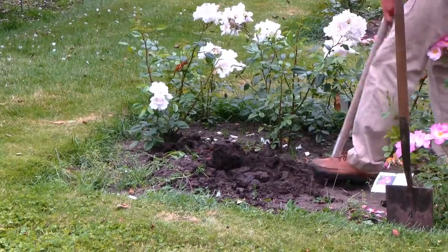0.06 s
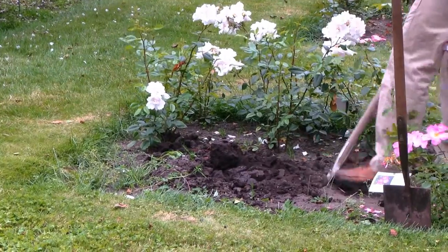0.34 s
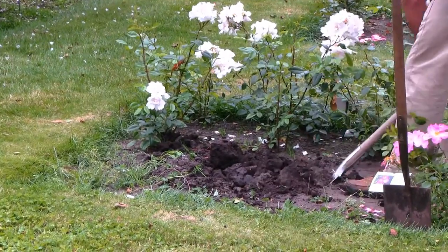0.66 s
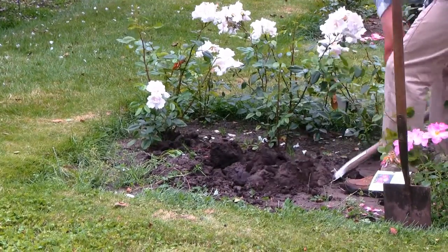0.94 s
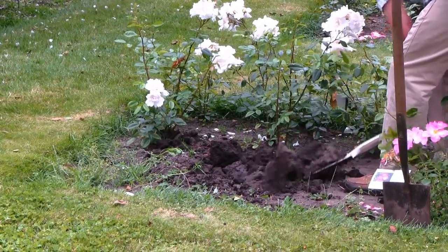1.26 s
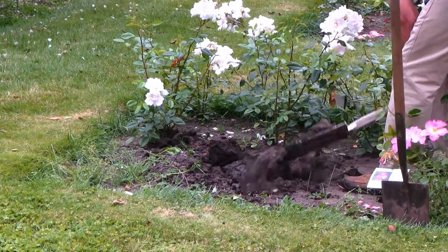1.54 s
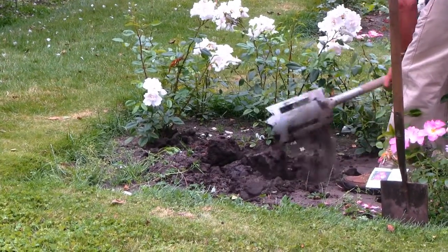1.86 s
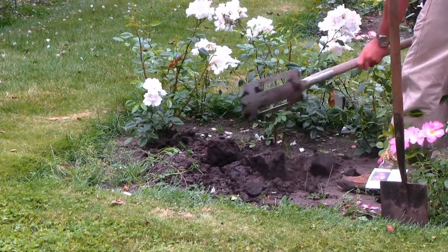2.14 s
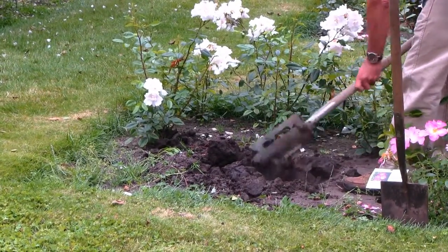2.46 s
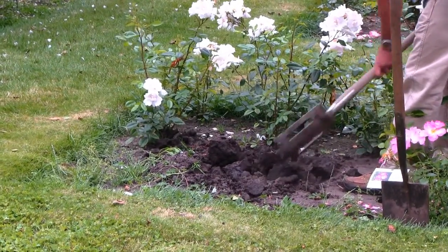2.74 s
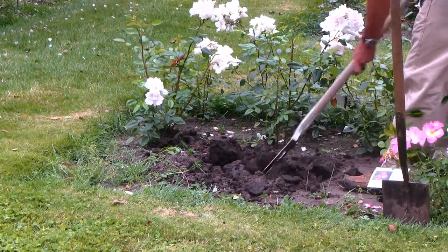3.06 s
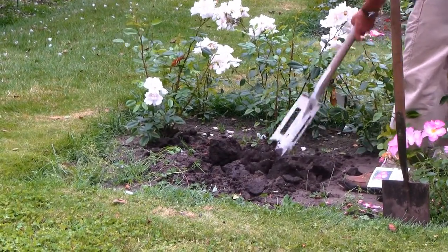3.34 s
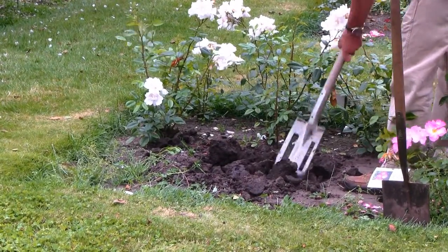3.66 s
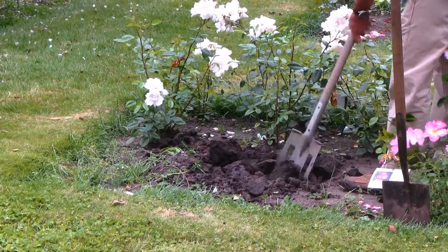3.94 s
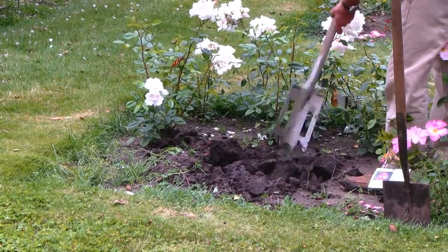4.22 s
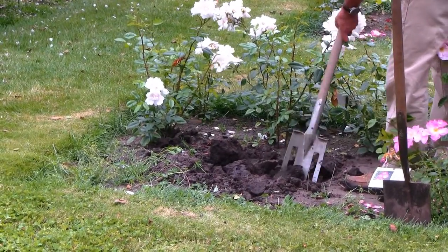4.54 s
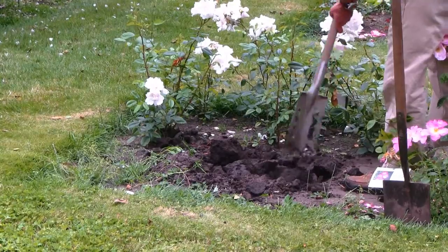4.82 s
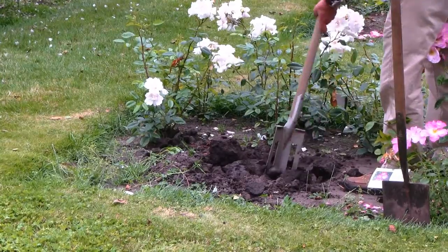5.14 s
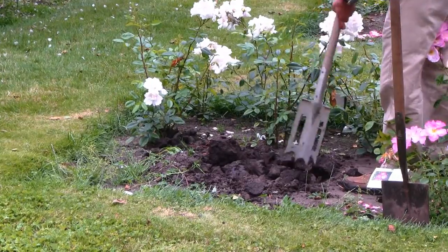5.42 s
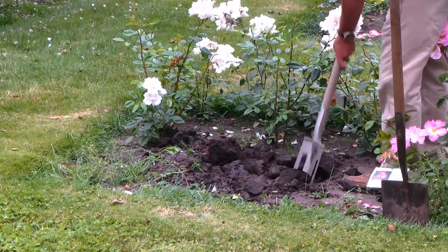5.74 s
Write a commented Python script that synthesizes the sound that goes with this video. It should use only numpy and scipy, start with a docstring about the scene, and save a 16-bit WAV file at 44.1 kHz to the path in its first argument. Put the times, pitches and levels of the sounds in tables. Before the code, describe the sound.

Low wind rumble buffets the microphone throughout, strongest from about 1.4 to 2 seconds, over faint outdoor air. A steel spade works garden soil, giving a light knock at 0.5 seconds, a soft scrape at 0.9, a click at 1.3 and a quick cluster of crunches at 1.5. Loose earth trickles faintly between strokes. Sharp, stony clicks come at 2.3 and 2.6 seconds, then the chopping grows busier: a scrape and hit at 3.1, hard knocks at 3.5 and 4.0, with a gritty scrape between them at 3.7. More stabs and chattering scrapes follow from 4.4 to 4.7 and from 5.1 to 5.3. The blade rings faintly around 3.5, 3.7 and 5.3 seconds. A distant engine drones quietly from about 4 seconds, and crumbs rustle near the end at 5.8. Nearly everything is on the left.

```python
"""Digging on a windy day

A slotted steel spade levers up garden soil, then chops and scrapes through the clods. Each stab knocks,
crunches and chatters through grit, and the blade rings faintly after a hard blow or as it comes free.
Gusts buffet the microphone and make a limiter turn the garden down; an engine drones far off.
Nearly all the sound is on the left."""
import sys
import numpy as np
from scipy import signal
from scipy.fft import rfft, irfft
from scipy.io import wavfile
from scipy.ndimage import uniform_filter1d

SR = 44100
rng = np.random.default_rng(int(sys.argv[2]) if len(sys.argv) > 2 else 0)


def unload_wav(signal):
    """Save mono or channel-first audio to the path in sys.argv[1] as 16-bit WAV at rate SR, clipped to [-1, 1]."""
    wavfile.write(
        sys.argv[1],
        SR,
        np.round(np.clip(np.atleast_2d(signal).T, -1, 1) * 32767).astype(np.int16),
    )


N = 255339
TIME = np.arange(N) / SR
FREQS = np.fft.rfftfreq(N, 1 / SR)
FILTER_HZ = np.fft.rfftfreq(4096, 1 / SR)

# Tone of the outdoor air: pitch_hz, level_db
AIR_TONE = [(120, -6.5), (330, -5), (500, -0.5), (780, -3.5), (1600, -12), (2600, -19), (6000, -29),
            (13000, -32), (15800, -56)]
# Tone of the engine's roar: pitch_hz, level_db
ENGINE_TONE = [(150, -24), (310, -11), (460, 0), (700, -2), (950, -9), (3200, -32), (5000, -37.5),
               (13000, -44.5), (15800, -69)]
# How fast the engine fires: time_s, rate_hz
FIRING_RATE = [(3.4, 120.1), (4.6, 110.8), (5.79, 116.4)]
# Notes in the engine's hum: multiple_of_firing_rate, level_db
HUM_NOTES = [(4, -1), (5, -16.5), (6, -5.5)]
# The engine swells: time_s, level_db
ENGINE_LEVEL = [(2.8, -86), (4.0, -47.5), (4.2, -42), (4.95, -48), (5.35, -45), (5.79, -48.5)]
# Its hum compared with its roar: time_s, level_db
HUM_LEVEL = [(3.8, -44), (4.7, 3), (5.79, -3.5)]

# Tone of the wind's rumble and of its small swirls: pitch_hz, level_db
RUMBLE_TONE = [(10, -23), (22, -12.5), (39, 6), (75, -6.5), (124, -19.5), (250, -48), (450, -79),
               (1200, -100)]
FLUTTER_TONE = [(30, 5), (80, 12), (140, 3.5), (230, -6.5), (400, -23), (900, -71)]
# The breeze between gusts: time_s, level_db
BREEZE = [(0, -18), (.66, -23.5), (.74, -26), (1.15, -28.5), (2.08, -38.5), (2.17, -27.5), (2.3, -39.5),
          (3.3, -31.5), (3.45, -34.5), (4.05, -19.5), (4.7, -36), (5.1, -24), (5.79, -30)]
# Gusts on the microphone: start_s, length_s, level_db
GUSTS = [(-.03, 0.095, -23), (.14, 0.17, -13), (.45, 0.12, -17), (.82, 0.088, -18.5), (1.29, 0.093, -24),
         (1.36, 0.22, -9), (1.605, 0.08, -7), (1.72, 0.14, -7), (1.92, 0.073, -5.5), (2.38, 0.13, -19),
         (2.51, 0.19, -11.5), (2.74, 0.099, -16.5), (2.855, 0.07, -14), (2.985, 0.028, -21),
         (3.65, 0.065, -8), (3.8, 0.166, -12.5), (4.115, 0.098, -15), (4.31, 0.1, -20.5),
         (4.55, 0.053, -16), (5.18, 0.073, -20), (5.29, 0.1, -24.5), (5.47, 0.25, -21), (5.72, 0.1, -14)]
# Single swirls that slap the microphone: peak_s, level_db
SLAPS = [(0.33, -16.5), (0.617, -20.5), (1.409, -15.5), (1.54, -11.5), (1.634, -15), (2.414, -9),
         (3.377, -27.5), (3.82, -16), (5.78, -16.5)]

# Tone of loose soil: pitch_hz, level_db
SOIL_TONE = [(1500, -13), (2500, -8), (4200, -5), (6200, 1.5), (9000, -5), (13000, -13), (15800, -36)]
# Soil trickles as the blade works it: start_s, length_s, level_db
TRICKLES = [(0, 0.17, -58.5), (.4, 0.43, -59), (.665, 0.3, -52), (1.02, 0.25, -64.5), (1.68, 0.63, -63),
            (2.36, 0.17, -59), (2.77, 0.055, -55.5), (3.17, 0.13, -52.5), (4.09, 0.12, -50),
            (4.99, 0.15, -51), (5.575, 0.18, -48), (5.68, 0.12, -43)]

# The blade's own notes: pitch_hz, level_db, time_to_fade_60_db_s
BLADE_NOTES = [(820, -7, 0.05), (1121, -12, 1), (1404, -4, .04), (1648, -9, 0.58), (1736, -2, 0.16),
               (2140, -4.5, .1), (2670, -1.5, 0.058), (2978, -2.5, 0.095), (3230, -5.5, 0.034),
               (3597, -12, 0.41), (3840, -5.5, 0.16), (4430, 4.5, 0.06), (4545, -14, 0.1), (4840, -5, 0.18),
               (5790, -0.5, 0.07), (6380, -15.5, .05), (6940, -19, .04)]
# Five bands, low to high, that shape knocks and scrapes: pitch_hz
BANDS_HZ = [480, 1060, 2300, 4450, 8500]
# Tone shared by all scrapes, one value a band: level_db
SCRAPE_TONE = [-2.5, -1.5, -3.5, -3, -8.5]
# Tone shared by all knocks, one value a band: level_db
KNOCK_TONE = [-1, 4.5, -5, -2, -7.5]
# The blade slides through grit: start_s, length_s, swell_db, pitch_hz, level_db, tilt_db_per_octave
SCRAPES = [(0.868, 0.082, 11.5, 1800, -45, -8), (2.596, 0.023, 2, 4840, -34, -6.5),
           (2.626, 0.013, -15, 5600, -25.5, -6), (2.991, 0.15, -6.5, 5800, -37, 0),
           (3.128, 0.017, -9, 3340, -24.5, -0.5), (3.214, 0.12, -11, 3620, -45, -3),
           (3.407, 0.13, 14, 4260, -39.5, -4.5), (3.521, 0.098, -11, 1280, -27, -3),
           (3.659, 0.055, 15, 4180, -24.5, 0), (4.421, 0.055, -3, 4630, -35, 0),
           (4.457, 0.037, -8, 2270, -29.5, 1), (4.589, 0.038, 11, 4540, -26, -3.5),
           (4.617, 0.035, 1.5, 2160, -17.5, 0), (5.1, 0.012, -1, 3020, -27, 3),
           (5.169, 0.089, 2, 4170, -36.5, 2), (5.229, 0.031, -2, 3173, -24, -1.6),
           (5.264, 0.024, 0, 3640, -21, -1.5)]
# The blade hits a clod or stone: hit_s, decay_s, pitch_hz, level_db, tilt_db_per_octave, stone_boost_db
KNOCKS = [(0.471, 0.0046, 910, -20, -2.5, 6), (0.4922, 0.017, 1090, -35, 1, 2),
          (0.975, 0.00086, 10300, -40, 5.5, 15.5), (1.277, 0.001, 2500, -21, -4.5, 0),
          (1.4724, 0.0026, 1620, -14, 1, 21.5), (1.4762, 0.0027, 6200, -14, 3.5, 5),
          (1.4889, 0.0026, 2290, -17.5, -7, 14), (1.4973, 0.0024, 2960, -12, 3, 0.5),
          (2.3477, 0.0013, 2800, -11, 0.5, 2), (2.525, 0.022, 5830, -34, 1, 2),
          (2.545, 0.0025, 6040, -31, 0.5, 24.5), (2.5864, 0.0013, 1520, -5.5, -3, 25),
          (2.5868, 0.0019, 820, -9, 1, 14), (3.101, 0.0021, 3300, -5, -1, 19.5),
          (3.171, 0.0051, 1540, -30.5, 0, 10), (3.508, 0.0055, 1610, -0.5, -2, -0.5),
          (3.707, 0.0042, 3930, -15, 3, 5.5), (3.96, 0.0031, 1070, 4.5, -5, -7),
          (4.4751, 0.0026, 1960, -13.5, -2.5, 8.5), (4.5125, 0.0023, 1060, -4.5, -0.5, -1),
          (4.6338, 0.0034, 4320, -9.5, 2, 2), (4.6436, 0.0042, 1920, -28, 8, 17),
          (5.062, 0.019, 4800, -8.5, -4, 9.5), (5.081, 0.0086, 920, -12, 3.5, 16.5),
          (5.0927, 0.0034, 1110, -1.5, -2.5, -29), (5.267, 0.01, 2770, -28.5, 5.5, 21.5)]
# The blade rings on: start_s, favoured_pitch_hz, level_db
RINGS = [(3.255, 3580, -44), (3.512, 1170, -21), (3.718, 2940, -23.5), (4.645, 3470, -36),
         (5.28, 3620, -29)]

# Tone of the leak into the right channel and of the hiss there: pitch_hz, level_db
LEAK_TONE = [(100, -72.5), (400, -50), (4000, -45), (12000, -34)]
HISS_TONE = [(30, 22.5), (300, 13.5), (2000, 8.5), (13500, 2), (15800, -0.5)]

LEAD_S = .01  # room before each hit for the first crumbs


def amp(db):
    """Turns decibels into a gain."""
    return 10 ** (np.asarray(db) / 20)


def unit(x):
    """Scales a signal to an average power of 1."""
    return x / np.sqrt(np.mean(x ** 2) + 1e-20)


def curve(rows):
    """Joins (time_s, value) points with straight lines."""
    return np.interp(TIME, *np.transpose(rows))


def tone_db(tone, hz):
    """Looks up a tone table's level at each pitch."""
    pitches, db = np.transpose(tone)
    return np.interp(np.log(hz + 1), np.log(pitches + 1), db)


def add(mix, start_s, sound):
    """Mixes a sound in at its start time."""
    part = mix[max(round(start_s * SR), 0):][:len(sound)]
    part += sound[:len(part)]


def shaped(x, tone):
    """Filters a signal by a tone table."""
    return irfft(rfft(x) * amp(tone_db(tone, FREQS)), N)


def noise(tone):
    """Noise with the given tone, at power 1."""
    return unit(shaped(rng.standard_normal(N), tone))


def drift(hz):
    """A random wobble, up to about hz."""
    return unit(irfft(rfft(rng.standard_normal(N)) / (1 + (FREQS / hz) ** 4), N))


def swells(rows, rise_s, fall_s=.015):
    """A loudness curve in which each row rises, holds and dies away."""
    power = np.zeros(N)
    for start_s, length_s, db in rows:
        rise = np.clip((TIME - start_s) / rise_s, 0, 1)
        fall = np.exp(-np.maximum(TIME - start_s - length_s, 0) / fall_s)
        power += (amp(db) * rise * fall) ** 2
    return np.sqrt(power)


def air_and_engine():
    """Over steady outdoor air, a far engine roars and hums at multiples of its firing rate."""
    midrange = signal.butter(4, [500, 1800], "band", fs=SR, output="sos")
    air, roar = (x / np.std(signal.sosfilt(midrange, x)) for x in (noise(AIR_TONE), noise(ENGINE_TONE)))
    firings = np.cumsum(curve(FIRING_RATE) * (1 + .00251 * drift(4.57))) / SR
    hum = sum(amp(db + 3.5 * drift(6)) * np.sin(2 * np.pi * k * firings) for k, db in HUM_NOTES)
    engine = amp(curve(ENGINE_LEVEL)) * (roar + hum * amp(curve(HUM_LEVEL)))
    flicker = amp(1.4 * drift(25))
    return flicker * (amp(-52) * air + engine)


def even_noise(tone, samples, floor):
    """Noise with its chance swings in loudness evened out."""
    x = noise(tone)
    return unit(x / np.sqrt(uniform_filter1d(x ** 2, size=samples, mode="wrap") + floor))


def wind(slap_rise_s=.013, slap_fall_s=.022):
    """Gusts ride on a breeze and push on the microphone; small, higher swirls grow with them."""
    rumble = even_noise(RUMBLE_TONE, samples=2200, floor=.0044)
    flutter = even_noise(FLUTTER_TONE, samples=900, floor=.019)
    strength = np.hypot(amp(curve(BREEZE)), swells(GUSTS, rise_s=.014))
    puffs = strength ** .78 * amp(-18.5 + 5.5 * drift(36))
    slaps = sum(amp(db) * np.exp(-np.maximum((s - TIME) / slap_rise_s, (TIME - s) / slap_fall_s))
                for s, db in SLAPS)
    lumps = amp(2 * drift(12))
    return rumble * lumps * strength + flutter * (puffs + slaps)


def loose_soil(crumbs_per_s=2500):
    """Trickling crumbs make a fine rustle with a few larger ticks."""
    sizes = amp(4 * np.minimum(rng.exponential(1, N), 5))
    crumbs = rng.standard_normal(N) * sizes * (rng.random(N) < crumbs_per_s / SR)
    rustle = unit(shaped(unit(crumbs) + 1.2 * rng.standard_normal(N), SOIL_TONE))
    flow = amp(-79) + swells(TRICKLES, rise_s=.0075)  # the soil never quite stops settling
    return rustle * flow * amp(-5.5 + 1.8 * drift(60))


def grit(loudness, per_s, spread_db):
    """Grains crack in clicks of uneven size, following a loudness curve."""
    n = len(loudness)
    sizes = amp(spread_db * np.minimum(rng.exponential(1, n), 4)) * rng.choice([-1, 1], n)
    clicks = loudness * (sizes * (rng.random(n) < per_s / SR) + .15 * rng.standard_normal(n))
    spectrum = rfft(clicks, 2 * n)
    broad_tone = np.sqrt(abs(uniform_filter1d(abs(spectrum) ** 2, size=n // 50)) + 1e-20)
    return irfft(spectrum / broad_tone)[:n] * np.linalg.norm(loudness)  # lows and highs made even


def contact_tone(tone, level_db, tilt_db, hz, stone_db=0):
    """Band levels of one contact: a shared tone, tilted, with a broad hump where stone is met."""
    bands = np.array(BANDS_HZ)
    octaves = np.log2(bands / bands[2])
    hump = np.exp(-(np.log2(bands / hz) / .76) ** 2)
    return np.array(tone) + level_db + tilt_db * octaves + stone_db * hump


def buried_blade(x, band_db, steel_db, damping, peak_db=0):
    """Filters a crunch through the blade; soil damps its notes, which makes them broader."""
    tone = [(100, band_db[0] + 1.5), (280, band_db[0] - 10), *zip(BANDS_HZ, band_db),
            (15500, band_db[-1] - 14.5)]
    notes = 0
    for hz, db, _ in BLADE_NOTES:
        louder, higher = rng.standard_normal(2)  # each contact loads the blade differently
        distance = (FILTER_HZ - hz * (1 + .03 * higher)) / (22 + damping * hz)
        notes += amp(db + 3.5 * louder) / (1 + distance ** 2)
    steel = 1 + amp(steel_db) * notes
    steel /= np.sqrt(uniform_filter1d(steel ** 2, size=280))
    ripple = unit(np.convolve(rng.standard_normal(len(FILTER_HZ)), np.hanning(25), "same"))
    ripple_db = 4.5 * np.minimum(FILTER_HZ / 4000, 1) * (np.tanh(ripple) - .2)
    log_gain = np.log(amp(tone_db(tone, FILTER_HZ) + peak_db + ripple_db - 1.5) * steel)
    # build a filter that sounds only after it is struck (minimum phase)
    mirrored = np.r_[log_gain, log_gain[-2:0:-1]]
    response = np.fft.ifft(np.exp(np.conj(signal.hilbert(mirrored)))).real
    return signal.fftconvolve(x, response[:2048])


def resonate(x, hz, width_hz):
    """Keeps the part of a sound near a moving pitch."""
    spin = np.exp(2j * np.pi * np.cumsum(hz) / SR)
    feedback = np.exp(-np.pi * width_hz / SR)
    return 2 * (spin * signal.lfilter([1 - feedback], [1, -feedback], x / spin)).real


def ring(hz, beat_hz=7.5, rise_s=.008):
    """The blade's prongs ring, most near hz. They are not quite alike, so each note beats with a twin."""
    t = TIME[:24576]
    out = np.zeros(len(t))
    for note_hz, db, fade_s in BLADE_NOTES:
        cut_db = min(70 * abs(np.log2(note_hz / hz)), 20)
        cycles = note_hz * t + rng.random()
        pair = np.sin(2 * np.pi * cycles) - .4 * np.sin(2 * np.pi * (cycles + beat_hz * t))
        out += amp(db - cut_db - 60 * t / fade_s) * pair
    return out * np.minimum(t / rise_s, 1)


def scrape(length_s, swell_db, hz, level_db, tilt_db):
    """The blade sticks and slips through grit, chattering at a pitch that wanders and sinks."""
    t = TIME[:24576]
    progress = np.minimum(t / length_s, 1) - .5  # zero halfway through
    bite = 1 - np.exp(-t / (.09 * length_s))
    release = np.exp(-np.maximum(t - length_s, 0) / .0088)
    slips, wander = (unit(uniform_filter1d(rng.standard_normal(len(t)), size=n)) for n in (170, 400))
    loudness = bite * release * amp(swell_db * progress + 3 * slips)
    grains = grit(loudness, per_s=1700, spread_db=3)
    chatter = resonate(grains, hz * 2 ** (.1 * wander - .3 * progress), width_hz=150)
    chatter *= amp(18 + .5 * level_db)  # louder strokes chatter more
    band_db = contact_tone(SCRAPE_TONE, level_db, tilt_db, hz)
    return buried_blade(grains + chatter, band_db, steel_db=8, damping=.006)


def knock(decay_s, hz, level_db, tilt_db, stone_db):
    """Crumbs give way, then a sudden crush dies quickly; stone rings more and crumbles less."""
    t = TIME[:8192] - LEAD_S
    after = np.maximum(t, 0)
    first_crumbs = amp(-26) * np.exp(-abs(t) / .0014)
    crumble = amp(-28.5 - .45 * max(stone_db, 0)) * np.exp(-after / .014)
    crush = (1 - np.exp(-after / .0013)) * (np.exp(-after / decay_s) + crumble)
    grains = grit(first_crumbs + crush, per_s=6000, spread_db=4)
    peak = 1 / (1 + ((FILTER_HZ - hz) / (110 + .045 * hz)) ** 2)
    peak_db = (6 + .17 * stone_db) * (peak - .2)
    band_db = contact_tone(KNOCK_TONE, level_db, tilt_db, hz, stone_db)
    return buried_blade(grains, band_db, steel_db=3, damping=.018, peak_db=peak_db)


def spade():
    """All the knocks, scrapes and rings of the blade."""
    out = np.zeros(N)
    for hit_s, *settings in KNOCKS:
        add(out, hit_s - LEAD_S, knock(*settings))
    for start_s, *settings in SCRAPES:
        add(out, start_s, scrape(*settings))
    for start_s, hz, db in RINGS:
        add(out, start_s, amp(db) * ring(hz))
    return out


def scene():
    """The left channel carries the garden; the right has only a faint leak and hiss."""
    garden = spade() + loose_soil() + wind() + air_and_engine()
    right = shaped(garden, LEAK_TONE) + amp(-66) * noise(HISS_TONE)
    return 2 * np.array([garden, right])


def record(dry, ceiling=.93, recovery_db_per_s=15):
    """A limiter turns the sound down in strong gusts and recovers slowly; the top treble is cut."""
    peak_db = 20 * np.log10(abs(uniform_filter1d(dry[0], size=64)) / ceiling + 1e-9)
    recovery = recovery_db_per_s * TIME
    cut_db = np.maximum(np.maximum.accumulate(peak_db + recovery) - recovery, 0)
    limited = dry / amp(uniform_filter1d(cut_db, size=130))
    rounded = limited / (1 + limited ** 6) ** (1 / 6)  # rounds off clicks that slip past
    treble_cut = signal.firwin(511, 16000, window=("kaiser", 9), fs=SR)
    return signal.oaconvolve(rounded, treble_cut[None], "same")


dry = scene()
out = record(dry)
unload_wav(out)
```